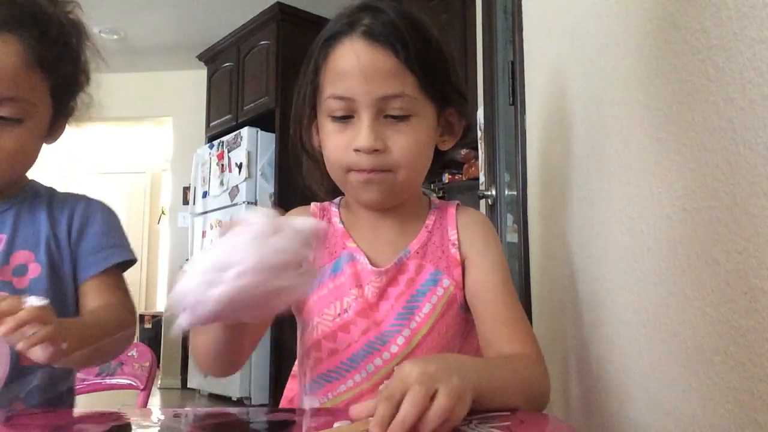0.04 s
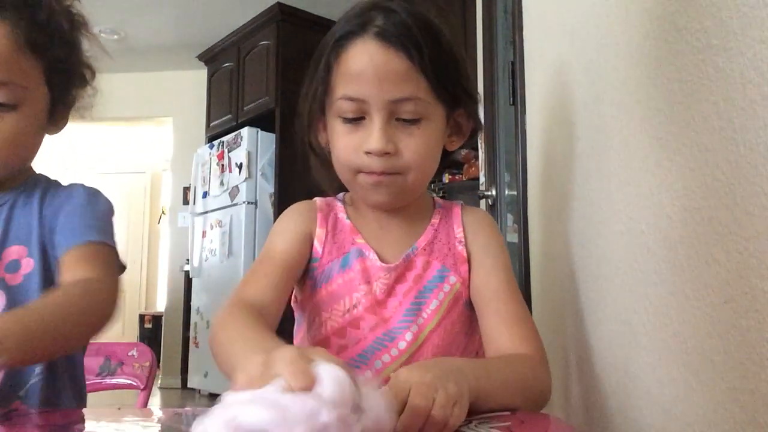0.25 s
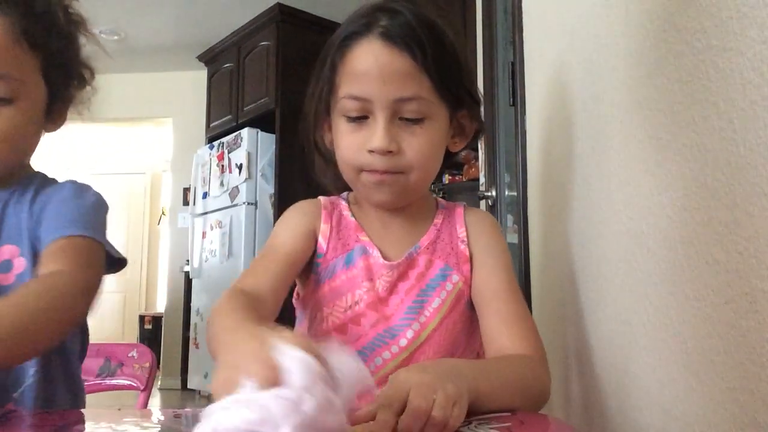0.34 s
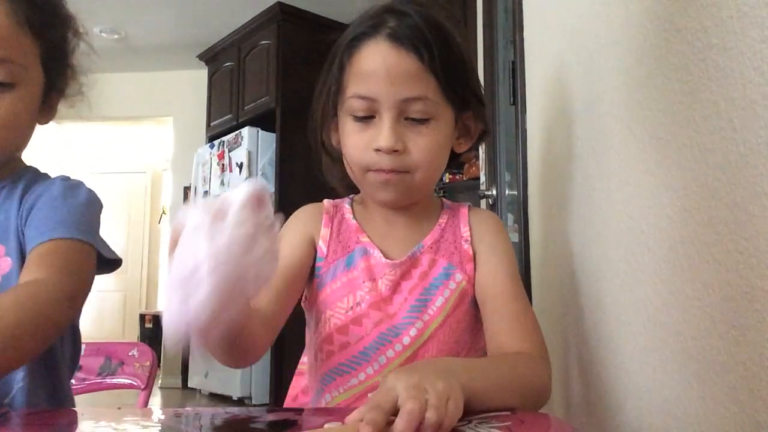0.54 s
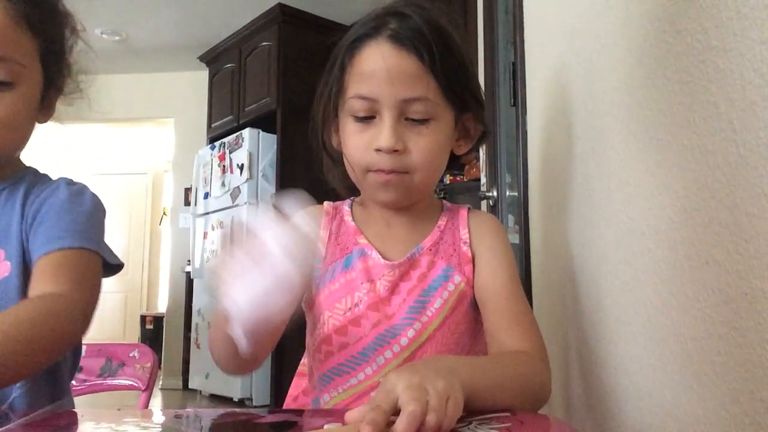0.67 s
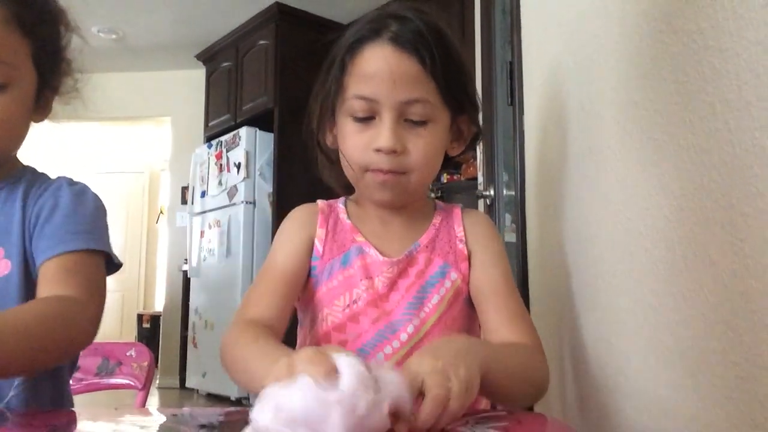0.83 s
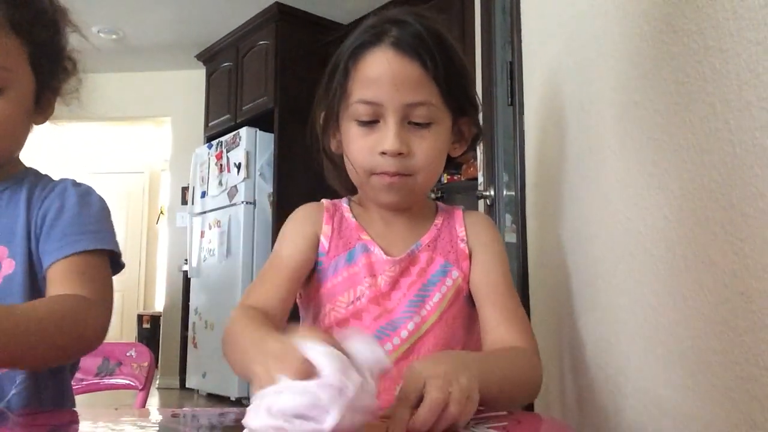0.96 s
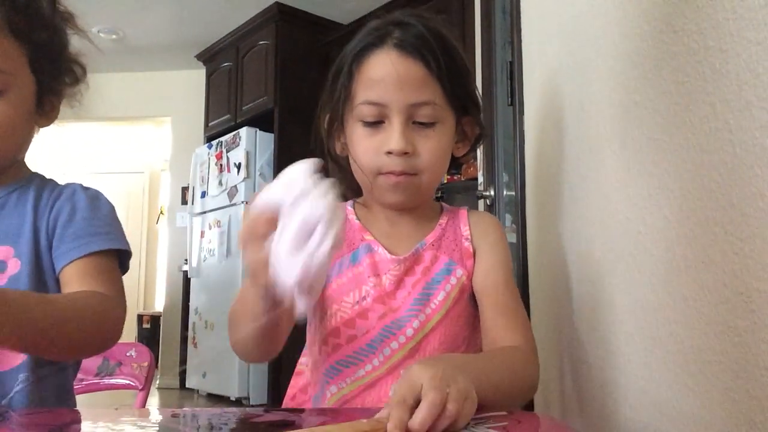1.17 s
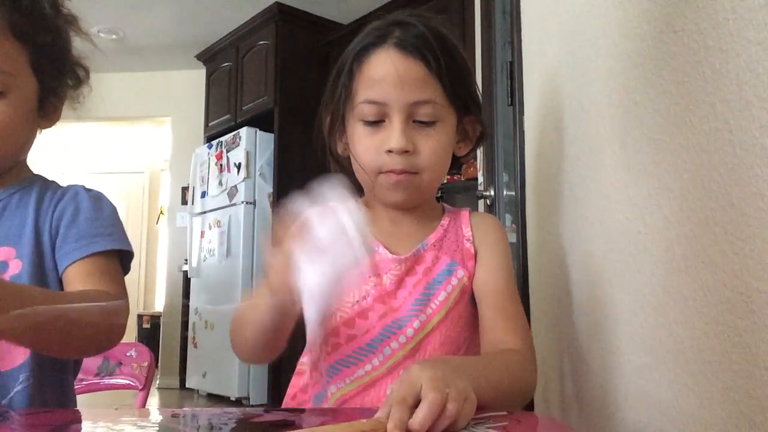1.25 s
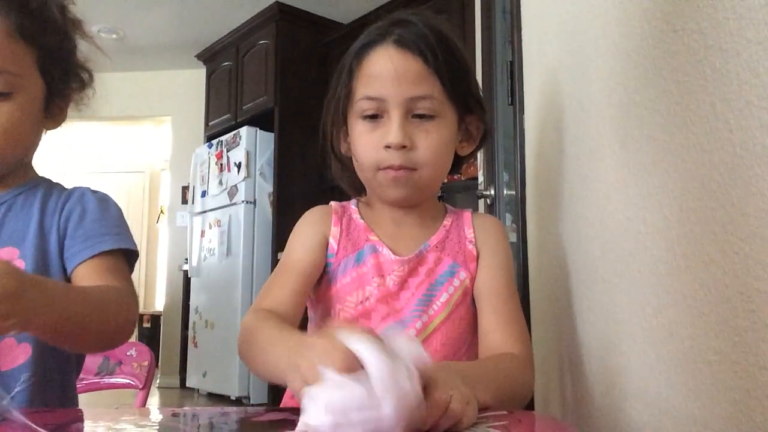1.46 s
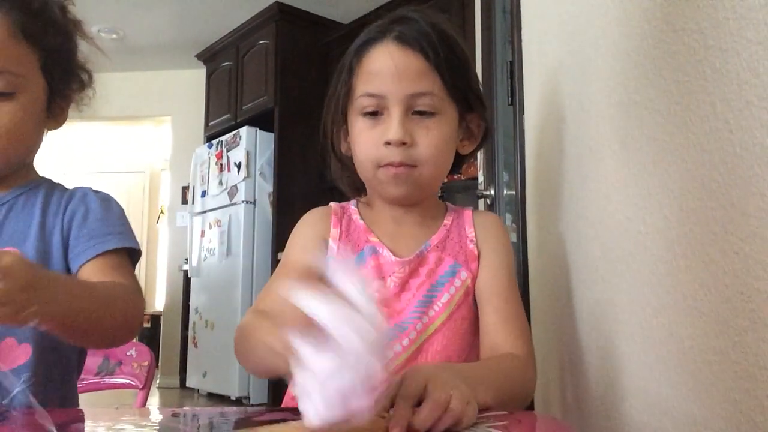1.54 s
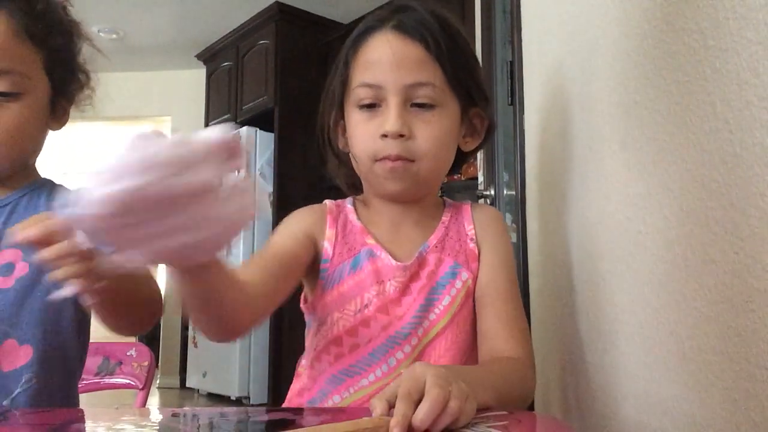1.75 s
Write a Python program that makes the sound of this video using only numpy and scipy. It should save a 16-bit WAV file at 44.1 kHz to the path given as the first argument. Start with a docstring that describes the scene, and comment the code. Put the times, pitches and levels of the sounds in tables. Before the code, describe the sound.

A lump of slime slaps onto a table three times, close to the microphone, the first with a sharp clap. Between the wet, thudding landings it peels off with faint sticky clicks in a quiet kitchen.

```python
"""Slime slapped on a kitchen table

A lump of slime lands three times, close to the microphone: a few wet contacts over a dull thud of the
table top. The first landing traps air and claps. Small bubbles pop, and between landings the slime
peels off with sticky clicks and a faint crackle. The kitchen rings briefly over a low room tone."""
import sys
import numpy as np
from scipy import signal
from scipy.fft import rfft, irfft
from scipy.io import wavfile
from scipy.ndimage import uniform_filter1d

SR = 44100
rng = np.random.default_rng(int(sys.argv[2]) if len(sys.argv) > 2 else 0)


def master_out(mix):
    """Clip the mix to full scale and print it as 16-bit PCM to the path in sys.argv[1]."""
    frames = np.transpose(np.atleast_2d(mix))
    ceiling = np.clip(frames, -1, 1)
    pcm = np.round(ceiling * 32767).astype(np.int16)
    wavfile.write(sys.argv[1], SR, pcm)


N = 79380


def amp(db):
    """Decibels to gain."""
    return 10 ** (np.asarray(db) / 20)


def unit(x):
    """Scales to rms 1."""
    return x / np.sqrt(np.mean(x ** 2) + 1e-20)


def curve_at(points, hz):
    """Reads a curve of (Hz, value) points on a log-frequency axis."""
    point_hz, value = np.transpose(points)
    return np.interp(np.log(hz + 1), np.log(point_hz + 1), value)


def add(mix, start, sound):
    """Mixes a sound in at a start time in seconds."""
    part = mix[max(round(start * SR), 0):][:len(sound)]
    part += sound[:len(part)]


def colour(x, tone, size=4096):
    """Minimum-phase EQ through (Hz, dB) points: nothing rings ahead of an attack."""
    log_gain = np.log(amp(curve_at(tone, abs(np.fft.fftfreq(size, 1 / SR)))))
    taps = np.fft.ifft(np.exp(np.conj(signal.hilbert(log_gain)))).real
    return signal.fftconvolve(x, taps[:size // 2])[:len(x)]


def crackle(per_s, size=N, spread_db=2.5):
    """Tiny clicks of uneven strength at random moments, rms 1."""
    strength = amp(spread_db * np.minimum(rng.exponential(1, size), 4))
    return unit(strength * rng.choice([-1, 1], size) * (rng.random(size) < per_s / SR))


def room_tone(level_db=-56, waver_db=3.9):
    """A quiet bed of dark noise whose low end wavers."""
    # Each row: frequency in Hz, relative noise density in dB.
    spectrum = [(15, -36), (25, -9.5), (87, 3), (195, -3.5), (256, -3), (516, -8), (591, -6), (641, -11),
                (1370, -16), (1840, -15), (2760, -23), (9840, -31.5), (16000, -53)]
    gain = amp(curve_at(spectrum, np.fft.rfftfreq(N, 1 / SR)))
    bed = irfft(rfft(rng.standard_normal(N)) * gain, N)
    low = signal.sosfiltfilt(signal.butter(2, 300, fs=SR, output="sos"), bed)
    waver = unit(uniform_filter1d(uniform_filter1d(rng.standard_normal(N), size=3000), size=2000))
    return amp(level_db) * unit(bed - low + low * amp(waver_db * waver))


def peeling():
    """Fine sticky crackle swells and fades as the slime is pulled off the table."""
    # Each row: middle of the swell in seconds, half length in seconds, level before EQ in dB.
    pulls = [(0.052, 0.08, -56.5), (0.44, 0.046, -54), (0.519, 0.02, -50), (1.082, 0.065, -54.5),
             (1.573, 0.032, -54), (1.667, 0.0093, -60.5)]
    # Each row: frequency in Hz, EQ gain in dB.
    tone = [(200, -26), (1500, -12), (4500, -7), (11000, -6), (16000, -17)]
    t = np.arange(N) / SR
    swells = sum(amp(db) * np.exp(-((t - middle) / half) ** 2) for middle, half, db in pulls)
    return colour(swells * crackle(per_s=6400), tone)


def sticky_clicks(rise_s=0.0011, cup_hz=4050, cup_db=12):
    """A stuck patch tears loose; the small cup under it gives the click its pitch."""
    # Each row: start in seconds, relative level in dB, decay in seconds.
    patches = [(.0330, -25.5, 0.002), (.4275, -49, .003), (.608, -58.5, .002), (1.017, -56, 0.0024),
               (1.1456, -40.5, 0.0026), (1.589, -58, 0.0036)]
    # Each row: frequency in Hz, EQ gain in dB.
    tone = [(100, -24), (380, 5), (1100, -5.5), (2400, 4.5), (3000, -3), (6000, 3), (9500, -9),
            (12500, 0.5), (16000, -17)]
    t, envelope = np.arange(SR // 10) / SR, np.zeros(N)
    for start, db, decay in patches:
        add(envelope, start, amp(db) * np.minimum(t / rise_s, 1) * np.exp(-t / decay))
    tear = envelope * rng.choice([-1., 1.], N)
    cup = signal.lfilter(*signal.iirpeak(cup_hz, Q=5, fs=SR), tear)
    return colour(tear + amp(cup_db) * cup, tone)


def thuds(push_db=6.5, give_share=0.34, give_stretch=3.03):
    """The soft mass pushes the table top with a rounded blow; the top rings low and briefly."""
    # Each row: start in seconds, relative level in dB, contact time in seconds.
    blows = [(0.062, -46.5, 0.0071), (.220, -26, .012), (0.2551, -35, 0.0028), (.549, -27, 0.0059),
             (0.561, -30.5, 0.0061), (.583, -46, 0.0024), (0.592, -47, 0.005), (.751, -42.5, .0045),
             (.8325, -25, 0.0064), (.840, -25, 0.0044), (.868, -31, 0.01), (0.893, -33.5, 0.0056),
             (.920, -40, 0.0057), (0.94, -38, 0.0038), (1.416, -27, 0.0043), (1.4222, -20, .007),
             (1.433, -23.5, 0.0065), (1.451, -31, 0.0056), (1.4994, -28, 0.0052)]
    # Each row: frequency of a table-top mode in Hz, relative level in dB, t60 in seconds.
    modes = [(60.5, -8, 0.2), (100, -9, 0.072), (140, -14, 0.124), (182.7, -6.5, 0.15), (257, -16, 0.19),
             (337, -12, 0.069), (455, 4, 0.051)]
    t, out = np.arange(SR // 2) / SR, np.zeros(N)
    ring = sum(amp(db - 60 * t / t60) * np.cos(2 * np.pi * hz * t) for hz, db, t60 in modes)
    lead_s = 0.03  # space for the blow to swell ahead of its peak
    for start, db, contact in blows:
        from_peak = np.pi * ((t - lead_s) / contact - 0.5)
        force = np.exp(-from_peak ** 2)
        give = give_share * np.exp(-(from_peak / give_stretch) ** 2)  # the mass yields more slowly
        table_top = signal.fftconvolve(force / force.sum(), ring)[:len(t)]
        add(out, start - lead_s, amp(db) * (amp(push_db) * (force - give) + table_top))
    return out


def splats(rise_s=0.0012, splash_db=1, smack_db=4.5, smack_q=5.2, min_width_hz=600):
    """Each fold sticks down in a splash of tiny wet clicks; the gap it closes adds a narrow smack."""
    # Each row: start in seconds, relative level in dB, decay in seconds, centre of the smack in Hz.
    folds = [(0.2301, -18.5, 0.0013, 13200), (0.7961, -51, 0.015, 9800), (0.825, -36, 0.0038, 10000),
             (0.831, -29.5, 0.0027, 6000), (.838, -32, 0.0019, 9400), (0.841, -32.5, 0.0026, 2050),
             (.8335, -34.5, .004, 450), (1.4245, -37, 0.0074, 600), (.862, -41.5, 0.01, 7800),
             (1.404, -50, 0.01, 6800), (1.4113, -34, 0.0023, 9650), (1.4169, -36.5, 0.0061, 2500),
             (1.4271, -27.5, 0.0014, 5900), (1.4409, -38, 0.0037, 2370), (1.459, -46.5, 0.0095, 1080),
             (1.4453, -43, 0.0042, 8950), (1.504, -48, 0.0089, 7600), (1.5764, -48.5, 0.0048, 8400)]
    # Each row: frequency in Hz, EQ gain in dB.
    tone = [(100, -3), (400, 16), (800, 4), (1900, 4), (3800, -1.5), (6500, 2.5), (10000, 0.5),
            (13500, -5.5), (16000, -11)]
    t, out = np.arange(SR // 10) / SR, np.zeros(N)
    for start, db, decay, hz in folds:
        envelope = amp(db) * np.minimum(t / rise_s, 1) * np.exp(-t / decay)
        splash = envelope * crackle(per_s=20000, size=len(t))
        width_hz = max(hz / smack_q, min_width_hz)
        smack = signal.lfilter(*signal.iirpeak(hz, hz / width_hz, fs=SR), splash)
        add(out, start, amp(splash_db) * splash + amp(smack_db) * smack)
    return colour(out, tone)


def clap(start_s=0.2321, level_db=-3.5, length_s=0.0015):
    """Air trapped under a flat landing escapes as one steep pressure pulse."""
    # Each row: frequency in Hz, EQ gain in dB.
    tone = [(30, 1.5), (90, 1), (200, -2.5), (560, 3.5), (850, -5), (1500, -4.5), (2800, -3), (4600, -7),
            (12000, 5.5), (16000, 4.5)]
    age, out = np.arange(SR // 10) / SR / length_s, np.zeros(N)
    add(out, start_s, -amp(level_db) * (1 - age) * np.exp(-age))
    return colour(out, tone)


def bubbles(open_s=0.0004, pitch_climb=0.4):
    """An air bubble bursts and rings for a few milliseconds, rising in pitch as the cavity closes."""
    # Each row: start in seconds, level in dB, starting pitch in Hz, t60 in seconds.
    pops = [(0.2558, -22, 1240, 0.0081), (0.2619, -24.5, 960, 0.008), (0.8626, -21.5, 1550, 0.0048),
            (0.894, -31, 790, 0.0036), (0.9179, -24.5, 1050, 0.0065), (1.4185, -44, 1900, 0.0022),
            (1.455, -22.5, 950, 0.0042), (1.4765, -39, 1870, 0.0041), (1.509, -39.5, 2700, 0.013)]
    t, out = np.arange(SR // 10) / SR, np.zeros(N)
    for start, db, hz, t60 in pops:
        pitch = hz * (1 + pitch_climb * np.minimum(t / t60, 1))
        envelope = amp(db - 60 * t / t60) * np.minimum(t / open_s, 1)
        add(out, start, envelope * np.sin(2 * np.pi * np.cumsum(pitch) / SR))
    return out


def kitchen(x, build_s=0.00088, echo_s=0.037, echo_decay_s=0.004, echo_gain=0.64):
    """Diffuse reflections, each band dying at its own speed; the far walls answer in a cluster."""
    # Each row: frequency in Hz, relative level of the reverb in dB, t60 in seconds.
    bands = [(60, 6, 0.28), (200, 4.5, 0.45), (465, 4.5, 0.37), (1350, 6, 0.26), (3380, 0, 0.35),
             (8600, 1.5, 0.42), (13500, -2.5, 0.29)]
    band_hz, band_db, band_t60 = np.transpose(bands)
    hz, age, noise = signal.stft(rng.choice([-1., 1.], SR), SR, nperseg=256)
    db = curve_at(np.c_[band_hz, band_db], hz)[:, None]
    t60 = curve_at(np.c_[band_hz, band_t60], hz)[:, None]
    tail = signal.istft(noise * amp(db - 60 * age / t60), SR, nperseg=256)[1][:SR]
    t = np.arange(SR) / SR
    far_walls = echo_gain * (t > echo_s) * np.exp(-abs(t - echo_s) / echo_decay_s)
    tail *= (1 - np.exp(-t / build_s)) * (1 + far_walls)
    return signal.fftconvolve(x, tail / np.linalg.norm(tail))[:N]


def in_room(source, room_db, paths=1):
    """Direct sound plus reverb; a crackling source sprays a fresh pattern of clicks along each path."""
    direct = source()
    reflections = sum(kitchen(source()) for _ in range(paths)) / np.sqrt(paths)
    return direct + amp(room_db) * reflections


def scene():
    """Blows, wet contacts and peeling in the kitchen, over the room tone, in mono."""
    blows = in_room(thuds, room_db=-13.5) + in_room(clap, room_db=-12.5)
    landing = in_room(splats, room_db=-6, paths=3) + in_room(bubbles, room_db=-15)
    lifting = in_room(sticky_clicks, room_db=-12.5, paths=3) + in_room(peeling, room_db=-1.5)
    return (blows + landing + lifting + room_tone())[None]


def record(dry):
    """The microphone rolls off the deep bass; a steep low-pass trims the highest treble."""
    low_cut_hz, high_cut_hz = 33, 16000
    thinned = signal.sosfilt(signal.butter(2, low_cut_hz, "highpass", fs=SR, output="sos"), dry)
    low_pass = signal.firwin(255, high_cut_hz, window=("kaiser", 9), fs=SR)
    return signal.oaconvolve(thinned, low_pass[None], "same")


dry = scene()
out = record(dry)
master_out(out)
```